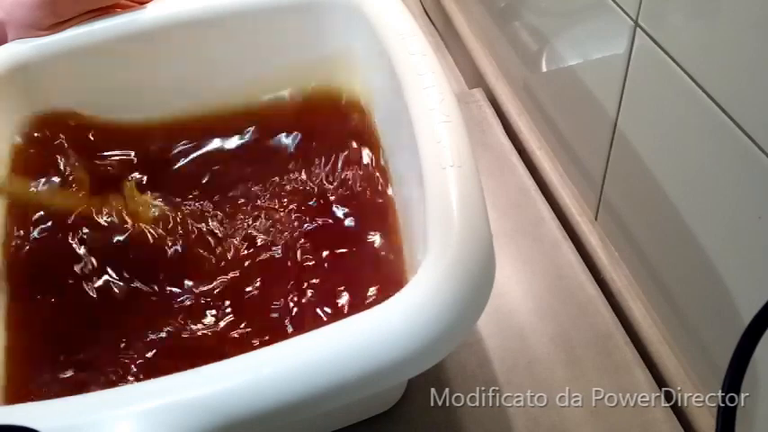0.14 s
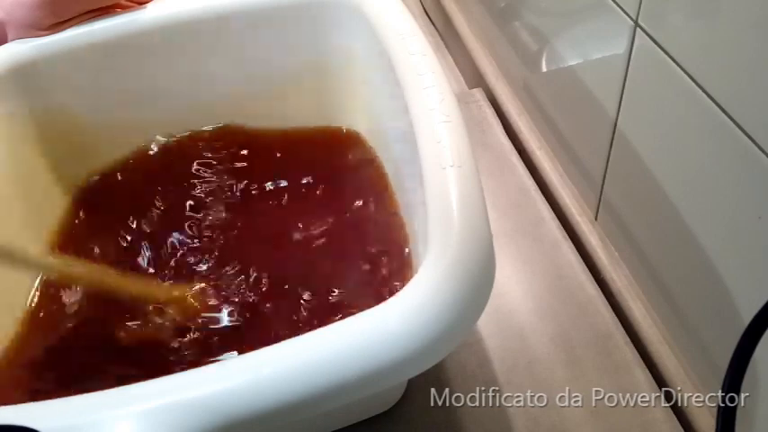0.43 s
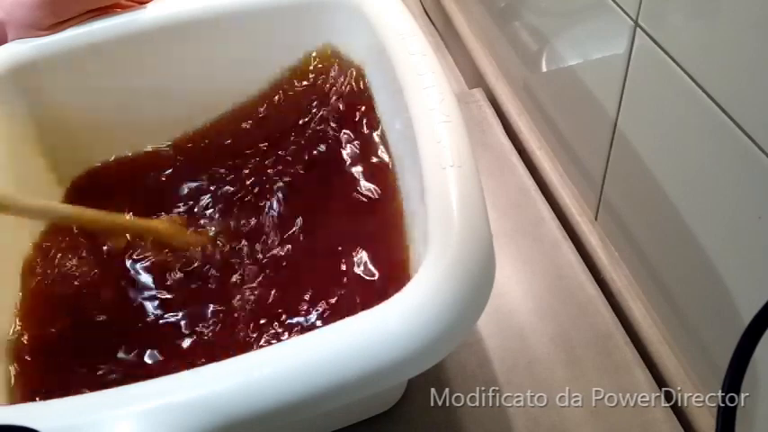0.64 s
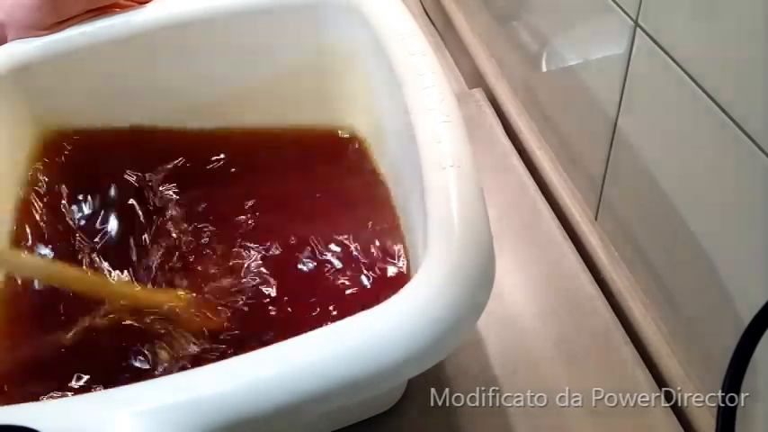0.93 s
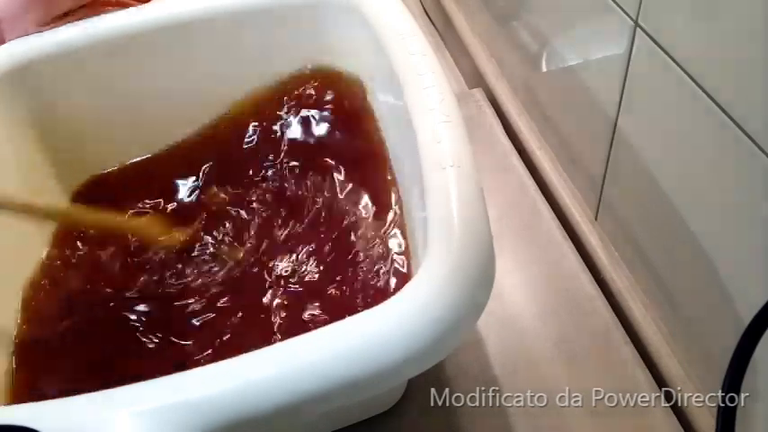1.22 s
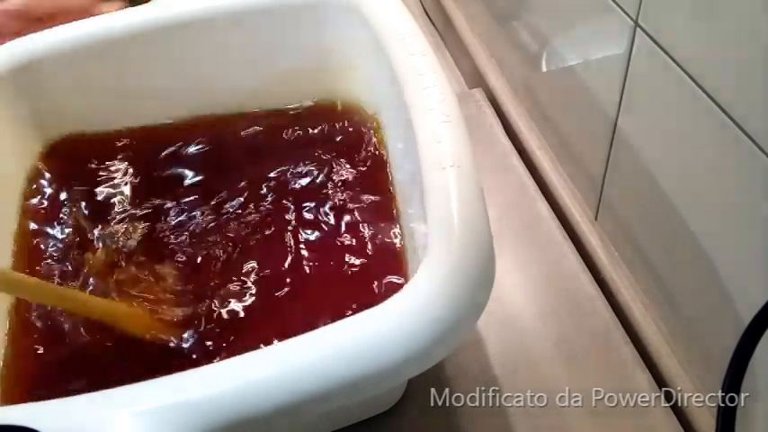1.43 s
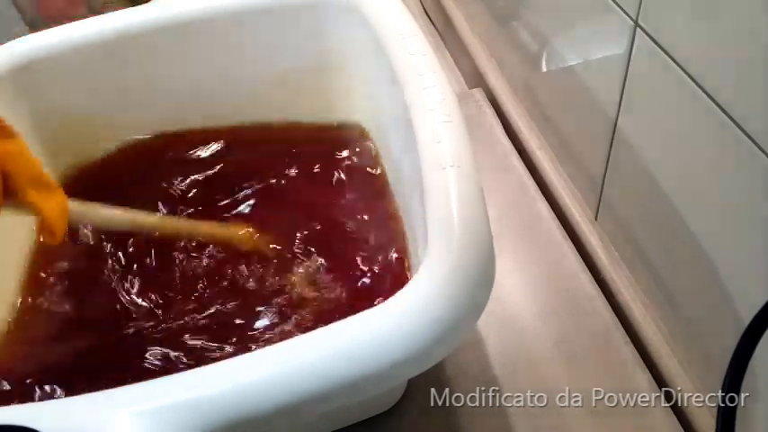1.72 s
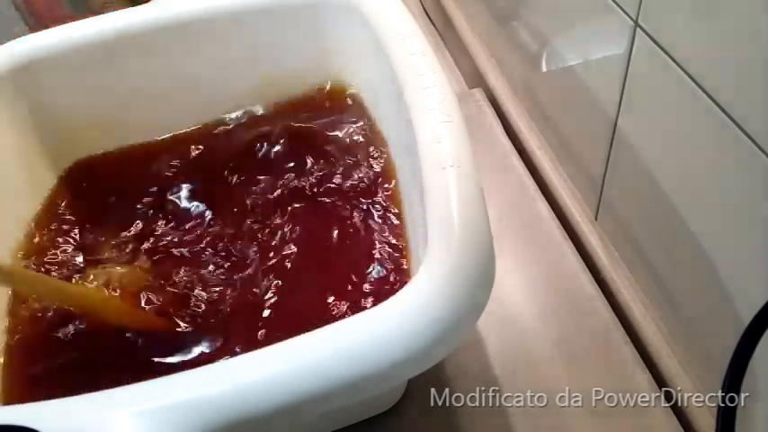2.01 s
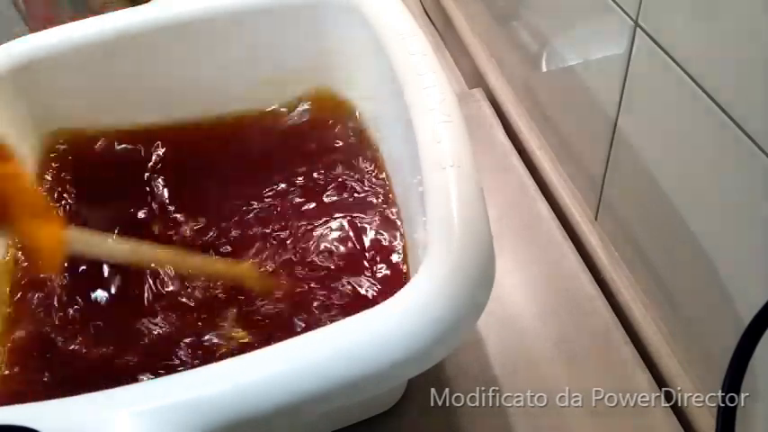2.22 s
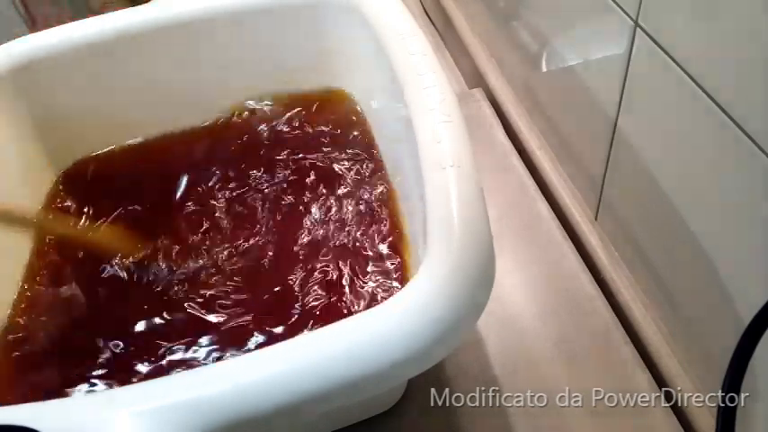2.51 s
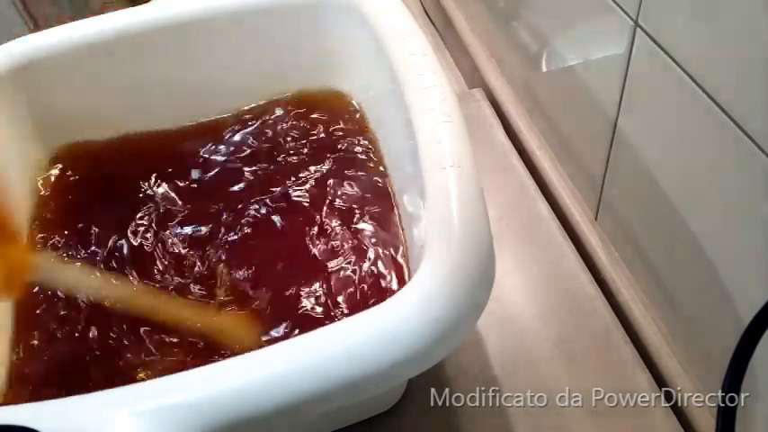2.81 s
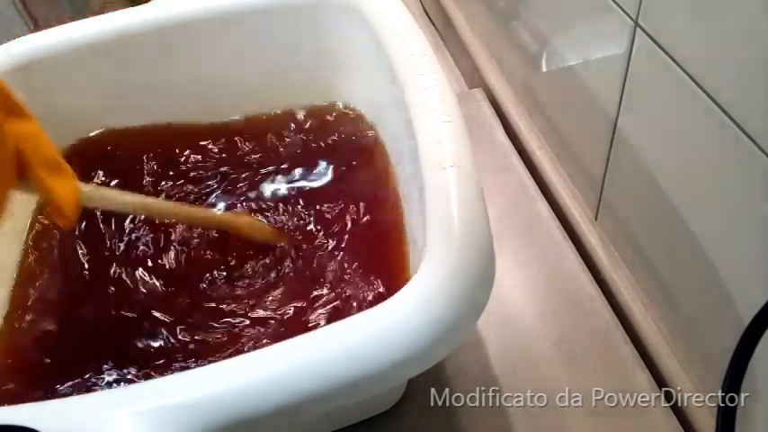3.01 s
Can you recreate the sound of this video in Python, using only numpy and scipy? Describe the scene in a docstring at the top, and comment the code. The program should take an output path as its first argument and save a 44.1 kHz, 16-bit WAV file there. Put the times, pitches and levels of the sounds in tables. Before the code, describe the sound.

Stirring water in a basin with a wooden spoon: swishing, gurgling bubbles and small crisp splashes

```python
"""Stirring thin liquid in a basin

A wooden spoon stirs a plastic basin in a tiled room. Air bubbles ring as sines sliding up or down,
droplets tick as filtered noise puffs, trains of small bubbles and droplets make fizz and spray,
noise gives swish, splashes and air, and the wave bumps the wall; basin and room ring on briefly.
"""
import sys
import numpy as np
from scipy import signal
from scipy.io import wavfile
from scipy.ndimage import uniform_filter1d

SR = 44100
rng = np.random.default_rng(int(sys.argv[2]) if len(sys.argv) > 2 else 0)


def wav_record(signal):
    """Record a signal, one row per channel, as 16-bit PCM in the file named by sys.argv[1]."""
    frames = np.transpose(np.atleast_2d(signal))
    bounded = np.clip(frames, -1, 1)
    # unit amplitude maps onto the largest positive 16-bit level
    quanta = np.round(bounded * 32767).astype(np.int16)
    wavfile.write(sys.argv[1], SR, quanta)


N = 141120  # samples, 3.2 s

# Background air spectrum. Each row: frequency in Hz, relative level in dB.
AIR_SPECTRUM = [(76, -23), (100, -8.5), (700, 1), (1500, -12), (16000, -21.5)]
# Swish spectrum. Each row: frequency in Hz, relative level in dB.
SWISH_SPECTRUM = [(200, -18), (700, -2), (1200, 8.5), (2000, 10.5), (6000, -6), (16000, -22)]
# Stirring strength. Each row: time in seconds, relative level of fizz and swish in dB, of spray in dB.
STIRRING = [(0, -82, -44), (0.071, -53.5, -51.5), (.17, -64, -48.5), (.22, -56.5, -45.5),
            (0.309, -49, -39.5), (0.369, -76, -52.5), (0.451, -54, -47.5), (.78, -48.5, -36),
            (.9, -46.5, -34.5), (1.0, -53, -49), (1.14, -56, -43), (1.35, -42.5, -38), (1.502, -45.5, -33),
            (1.622, -48.5, -40), (1.9, -50.5, -34.5), (2.149, -41.5, -42), (2.34, -55.5, -41.5),
            (2.7, -46.5, -41.5), (2.93, -54.5, -47), (3.02, -64, -47), (3.121, -75, -61)]
# Small-bubble weights by pitch. Each row: frequency in Hz, relative level in dB.
FIZZ_SPECTRUM = [(600, -16.5), (1300, -10.5), (2100, -1.5), (4500, -0.5), (8500, -36.5)]
# Large bubbles. Each row: start in seconds, level in dB, pitch in Hz, fade scale in ms,
# initial glide in octaves per fade scale.
LARGE_BUBBLES = [(0.067, -39.5, 3430, 5.7, 0.077), (0.1, -53, 504, 86, -0.0061),
                 (0.129, -41.5, 4090, 3.5, 0.067), (0.2011, -33, 2800, 1.5, -0.14),
                 (0.2, -44.5, 532, 18, -0.2), (0.215, -47, 812, 16, 0.89),
                 (0.2401, -32.5, 1670, 3.5, 0.063), (0.27, -52, 511.3, 41, -0.023),
                 (0.2808, -36, 1522, 11, 0.48), (0.406, -40, 4020, 2.2, 0.086),
                 (0.4324, -33.5, 3170, 4, -0.085), (0.4792, -32.5, 1680, 7.9, 0.2),
                 (0.4806, -43, 1320, 4.6, -0.073), (0.6081, -40.5, 1460, 3.6, -0.07),
                 (0.6371, -26.5, 2674, 5.1, -0.091), (0.6515, -38.5, 1070, 2.7, -0.005),
                 (0.691, -36, 2014, 6.3, -0.088), (0.7489, -28.5, 1910, 2.74, -0.099),
                 (0.7579, -27.5, 2610, 2.3, -0.098), (0.7627, -34, 597.4, 17.6, 0.61),
                 (0.8267, -33, 3460, 6.3, -0.055), (0.8605, -34.5, 1113, 5.8, 0.071),
                 (0.9317, -41.5, 851, 8.4, 0.13), (1.0858, -41.5, 1478, 5.2, -0.04),
                 (1.163, -35, 3860, 6, -0.11), (1.164, -47, 1166, 9.3, 0.16),
                 (1.1816, -41, 1595, 21.7, 0.41), (1.201, -35, 1778, 8.5, 0.02),
                 (1.2237, -35.5, 4690, 18.6, 0.25), (1.263, -37, 1140, 6.5, 0.18),
                 (1.2688, -26, 3860, 6.5, -0.034), (1.3124, -27, 3600, 1.9, 0.01),
                 (1.329, -39.5, 725, 4.2, 0.71), (1.3443, -37, 743, 16, -0.05),
                 (1.367, -34, 607, 10.4, 0.46), (1.379, -38, 556, 17, 0.123),
                 (1.379, -36, 1457, 4.8, -0.325), (1.3817, -32, 1830, 3.4, 0.073),
                 (1.4823, -32, 3130, 1, 0.078), (1.6133, -37, 2080, 3.6, 0.0033),
                 (1.646, -46, 671, 8.7, -0.19), (1.6584, -41, 1320, 5.3, -0.04),
                 (1.668, -39.5, 928, 4.2, -0.07), (1.748, -52.5, 1200, 9.5, 0.32),
                 (1.7047, -44, 1123, 8, 0.078), (1.8053, -37, 2120, 3.5, -0.13),
                 (1.854, -45, 440, 12, 0.21), (1.874, -42, 589, 7, 0.33), (1.9773, -27, 641, 6.5, -0.071),
                 (2.069, -37, 2170, 4.1, 0.0), (2.1057, -28.5, 2575, 7.1, -0.1),
                 (2.1157, -30.5, 1222, 7.7, 0.3), (2.13, -41, 2080, 2.6, 0.4),
                 (2.1649, -41.5, 910, 16.7, -0.15), (2.2304, -31, 2000, 4.7, -0.032),
                 (2.2317, -39.5, 3270, 5, -0.02), (2.267, -39.5, 3420, 3.8, -0.028),
                 (2.3735, -29, 2000, 2.5, -0.3), (2.3757, -31.5, 2470, 5.7, -0.068),
                 (2.488, -52.5, 1386, 9, -0.3), (2.5663, -26.5, 1895, 5.4, 0.047),
                 (2.588, -47.5, 1139, 24, -0.0014), (2.624, -41.5, 1850, 2.4, -0.06),
                 (2.627, -42.5, 590, 15, -0.11), (2.6463, -36, 2423, 6.3, 0.00092),
                 (2.657, -44.5, 581, 21.4, 0.08), (2.678, -45.5, 1136, 6.4, -0.014),
                 (2.7756, -35, 1350, 1.5, 0.14), (2.7783, -39.5, 883, 3.8, -0.077),
                 (2.7887, -28.5, 2770, 2.3, -0.065), (2.8774, -38, 1080, 2.5, 0.18),
                 (2.887, -44.5, 1340, 8.7, -0.06), (2.913, -37, 2100, 3.5, 0.24),
                 (2.925, -41, 2300, 3.1, -0.4), (2.9367, -37, 1910, 4.4, 0.031),
                 (2.956, -36.5, 3970, 5.4, -0.011), (3.062, -54, 773, 20, 0.03)]
# Wave bumps on the basin wall. Each row: start in seconds, level in dB, centre in Hz.
WALL_BUMPS = [(0.07, -67.5, 151), (0.66, -70, 130), (1.224, -62.5, 352), (1.541, -60, 160),
              (2.198, -66, 196), (2.824, -63, 283)]
# Droplet ticks. Each row: start in seconds, level in dB, centre in Hz.
DROPLETS = [(0.184, -30, 5600), (0.4723, -30, 4340), (0.6279, -29, 4230), (0.6498, -26.5, 3700),
            (0.7556, -22, 7100), (0.8147, -32, 4700), (0.8657, -27, 4600), (1.029, -30, 7200),
            (1.1493, -35, 4200), (1.189, -35, 4580), (1.3812, -22, 3900), (1.825, -29.5, 8100),
            (2.127, -30, 6200), (2.4692, -35.5, 5400), (2.5616, -29, 6460), (2.6529, -29, 4880),
            (2.778, -22.5, 5470), (2.848, -39, 5400), (2.873, -34.5, 7900), (2.9038, -35.5, 11800),
            (2.911, -36, 3460), (3.196, -42, 3700)]
# Splashes over the spoon. Each row: start in seconds, length in seconds, level in dB.
SPOON_SPLASHES = [(1.189, 0.12, -39.5), (1.333, 0.075, -46.5), (2.099, 0.074, -51.5), (2.659, 0.045, -52)]
# Splash noise spectrum. Each row: frequency in Hz, relative level in dB.
SPLASH_SPECTRUM = [(200, -9.5), (1500, -27.5), (4500, -7), (8000, -10), (16000, -31.5)]
# Basin resonances. Each row: centre in Hz, width in Hz, gain in dB.
BASIN_MODES = [(1101, 60, 5), (1346, 125, 7), (1818, 58, 1), (1290, 16, 1), (1880, 6.2, -7)]

AIR_DB, SWISH_DB, PATCH_DB = -68, -7.5, 4
SPRAY_PER_S, SPRAY_DECAY_MS, SPRAY_DB = 1300, 2.36, -15.5
SPRAY_SPREAD_DB, SPRAY_WIDE_DB = 6, -37
FIZZ_PER_S, FIZZ_MEAN_CYCLES, FIZZ_SPREAD_DB, FIZZ_DB = 750, 10, 5, -2.5
RISE_CYCLES, FADE_POWER = 0.76, 0.52
WOBBLE_DB, WAVER_OCTAVES = 5, 0.025  # random spread of level and pitch
PUFF_DB, PUFF_DECAY_MS, PUFF_PITCH_RATIO, PUFF_WIDE_DB = -7, 10, 1.33, -45  # relative to its bubble
BUMP_PEAK_MS, BUMP_WIDTH_HZ = 20, 120
TICK_DECAY_MS, TICK_WIDTH_RATIO, TICK_WIDE_DB = 5.5, 0.33, -10.5  # width as share of centre
SPLASH_FIZZ_DB = -2
ROOM_DB, ROOM_T60_S, ROOM_TREBLE_T60_S = -13, 0.45, 0.1
EDGE_HZ = 15900


def amp(db):
    """Amplitude factor of a level in dB."""
    return 10 ** (np.asarray(db) / 20)


def evened(x):
    """Signal scaled to unit RMS."""
    return x / np.sqrt(np.mean(x ** 2) + 1e-20)


def read(points, hz):
    """Interpolate a curve along log frequency."""
    f, value = np.transpose(points)
    return np.interp(np.log(hz + 1), np.log(f + 1), value)


def add(mix, start_s, sound):
    """Mix a sound in at its start time, cut at the end of the mix."""
    part = mix[round(start_s * SR):][:len(sound)]
    part += sound[:len(part)]


def highpass(x, hz, order):
    """Butterworth high-pass."""
    return signal.sosfilt(signal.butter(order, hz, "highpass", fs=SR, output="sos"), x)


def resonate(x, hz, width_hz):
    """A resonance of gain 1: shift hz to zero, smooth, shift back."""
    turn = np.exp(2j * np.pi * hz * np.arange(len(x)) / SR)
    r = np.exp(-np.pi * width_hz / SR)
    return 2 * (turn * signal.lfilter([1 - r], [1, -r], x / turn)).real


def noise(spectrum, patch_db, patch_bins=10, patch_frames=6):
    """Coloured noise whose patches of time and frequency swell and sink."""
    frames, hz = N // 128 + 5, np.fft.rfftfreq(512, 1 / SR)
    real, imaginary, patches = rng.standard_normal((frames, len(hz), 3)).T
    patches = uniform_filter1d(patches, size=patch_bins, axis=0)
    patches = evened(uniform_filter1d(patches, size=patch_frames, axis=1))
    gain = amp(read(spectrum, hz)[:, None] + patch_db * patches)
    sound = signal.istft((real + 1j * imaginary) * gain, nperseg=512, noverlap=384)[1]
    return evened(sound[:N])


def stir(axis):
    """Gain over time from one column of the stirring curve."""
    rows = np.array(STIRRING)
    return amp(np.interp(np.arange(N) / SR, rows[:, 0], rows[:, axis]))


def train(per_s, spread_db):
    """Random clicks, a few of them large."""
    sizes = amp(spread_db * np.minimum(rng.exponential(1, N), 3.5))
    return sizes * (rng.random(N) < per_s / SR)


def air():
    """Steady low-weighted noise, patchy in time and frequency."""
    return amp(AIR_DB) * noise(AIR_SPECTRUM, PATCH_DB, patch_bins=2, patch_frames=30)


def swish():
    """Moving liquid: patchy noise following the stirring."""
    return amp(SWISH_DB) * stir(axis=1) * noise(SWISH_SPECTRUM, PATCH_DB)


def spray(count=10):
    """Many tiny droplets: random trains of short ticks following the stirring."""
    out = np.zeros(N)
    for hz in np.geomspace(4000, 14000, count):
        one = tick(rng.standard_normal(400), SPRAY_DECAY_MS, hz, SPRAY_WIDE_DB)
        out += signal.oaconvolve(train(SPRAY_PER_S / count, SPRAY_SPREAD_DB), one)[:N]
    return amp(SPRAY_DB) * stir(axis=2) * evened(out)


def fizz(count=36):
    """Many small bubbles of all sizes in random trains, at unit level."""
    out = np.zeros(N)
    for hz in np.geomspace(600, 8500, count):
        fade_ms = 1000 * FIZZ_MEAN_CYCLES * rng.uniform(.5, 1.5) / hz
        one = bubble(hz, fade_ms, rng.uniform(-.1, .2))
        clicks = train(FIZZ_PER_S / count, FIZZ_SPREAD_DB)
        out += amp(read(FIZZ_SPECTRUM, hz)) * hz * signal.oaconvolve(clicks, one)[:N]
    return evened(out)


def bubble(hz, fade_ms, glide):
    """A pocket of air rings as a fading, wavering sine that slides in pitch."""
    t = np.arange(0, 3 * fade_ms / 1000, 1 / SR)
    u = t * 1000 / fade_ms
    rise = 1 - np.exp(-t * hz / RISE_CYCLES)
    shape = rise * np.exp(-u ** FADE_POWER) * np.cos(np.pi * u / 6)  # zero at u = 3
    wobble = np.interp(t * hz / 4, np.arange(80), rng.standard_normal(80))  # a new value every 4 cycles
    pitch_hz = hz * 2 ** (glide * 1.5 * np.tanh(u / 1.5) + WAVER_OCTAVES * wobble)
    level = shape / shape.max() * amp(WOBBLE_DB * wobble * np.minimum(u, 1))
    return level * np.sin(2 * np.pi * np.cumsum(pitch_hz) / SR)


def large_bubbles():
    """Single ringing bubbles, each throwing a puff of spray centred above its pitch."""
    out = np.zeros(N)
    grits = rng.standard_normal((len(LARGE_BUBBLES), 2500))
    for (start_s, db, hz, fade_ms, glide), grit in zip(LARGE_BUBBLES, grits):
        add(out, start_s, amp(db) * bubble(hz, fade_ms, glide))
        puff = tick(grit, PUFF_DECAY_MS, PUFF_PITCH_RATIO * hz, PUFF_WIDE_DB)
        add(out, start_s, amp(db + PUFF_DB) * puff)
    return out


def bumps():
    """The wave bumps the basin wall: soft low swells of narrow-band noise."""
    out, t = np.zeros(N), np.arange(6000) / SR
    u = t * 1000 / BUMP_PEAK_MS
    grits = rng.standard_normal((len(WALL_BUMPS), len(t)))
    for (start_s, db, hz), grit in zip(WALL_BUMPS, grits):
        body = resonate(resonate(grit, hz, BUMP_WIDTH_HZ), hz, BUMP_WIDTH_HZ)
        add(out, start_s, amp(db) * evened(body) * u * np.exp(1 - u))
    return highpass(out, 95, order=4)


def tick(grit, decay_ms, hz, wide_db):
    """A droplet bursts: a short puff of noise, strongest around hz, at unit peak."""
    puff = grit * np.exp(-np.arange(len(grit)) * 1000 / SR / decay_ms)
    width_hz = TICK_WIDTH_RATIO * hz
    narrow = resonate(resonate(puff, hz, width_hz), hz, 2 * width_hz)
    wide = puff - uniform_filter1d(puff, size=12)
    puff = narrow + amp(wide_db) * wide
    return puff / abs(puff).max()


def droplet_ticks():
    """Single droplets bursting."""
    out = np.zeros(N)
    grits = rng.standard_normal((len(DROPLETS), 700))
    for (start_s, db, hz), grit in zip(DROPLETS, grits):
        add(out, start_s, amp(db) * tick(grit, TICK_DECAY_MS, hz, TICK_WIDE_DB))
    return out


def splashes():
    """Rushes of spray and small bubbles over the spoon: sudden start, swell, quick end."""
    rush = np.zeros(N)
    for start_s, length_s, db in SPOON_SPLASHES:
        phase = np.pi * np.arange(0, length_s, 1 / SR) / length_s
        add(rush, start_s, amp(db) * np.sin(phase) ** 0.23)
    small_bubbles = highpass(fizz() + fizz(), 2600, order=2)
    return rush * (noise(SPLASH_SPECTRUM, PATCH_DB) + amp(SPLASH_FIZZ_DB) * small_bubbles)


def basin(x):
    """Resonances of the basin, excited by the water sounds."""
    return sum(amp(db) * resonate(x, hz, width_hz) for hz, width_hz, db in BASIN_MODES)


def room(x):
    """Dense reflections from tiles, the treble dying sooner."""
    hz, t, z = signal.stft(rng.standard_normal(SR // 2), SR, nperseg=256)
    t60_s = read([(1000, ROOM_T60_S), (8000, ROOM_TREBLE_T60_S)], hz)[:, None]
    tail = signal.istft(z * amp(-60 * t / t60_s), SR, nperseg=256)[1]
    tail = tail * (np.arange(len(tail)) > .004 * SR)  # 4 ms before the first reflection
    return signal.oaconvolve(x, tail / np.linalg.norm(tail))[:N]


def scene():
    """Water through basin and room, plus swish, bumps and air added direct."""
    water = spray() + amp(FIZZ_DB) * stir(axis=1) * fizz()
    water = water + large_bubbles() + droplet_ticks() + splashes()
    water = highpass(water, 330, order=4)  # small sources, no bass
    water = water + basin(water)
    return (water + amp(ROOM_DB) * room(water) + swish() + bumps() + air())[None]


def record(dry):
    """Band limit of the recorder: steep linear-phase low-pass."""
    lowpass = signal.firwin(511, EDGE_HZ, window=("kaiser", 9), fs=SR)
    return signal.oaconvolve(dry, lowpass[None], "same")


dry = scene()
out = record(dry)
wav_record(out)
```